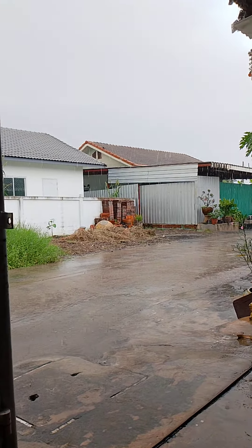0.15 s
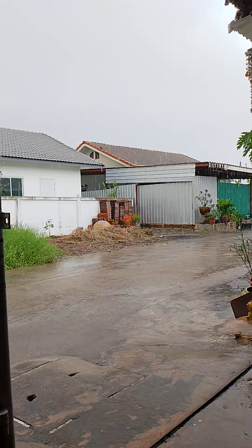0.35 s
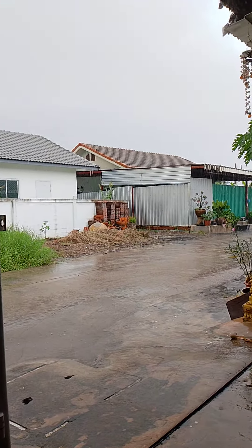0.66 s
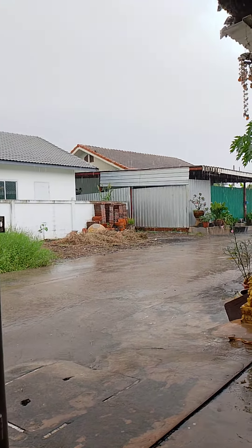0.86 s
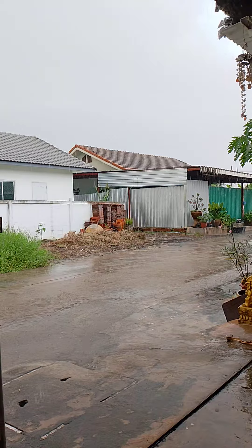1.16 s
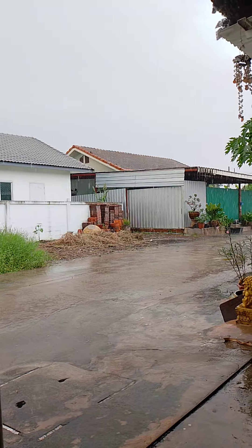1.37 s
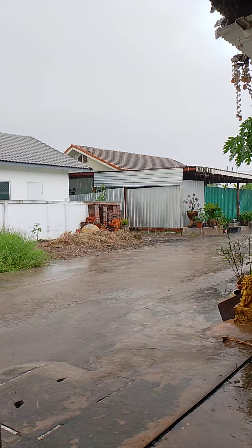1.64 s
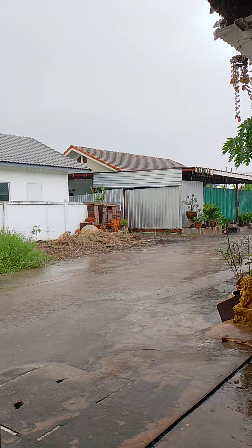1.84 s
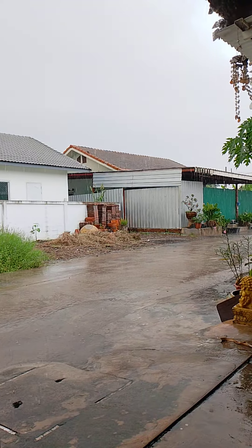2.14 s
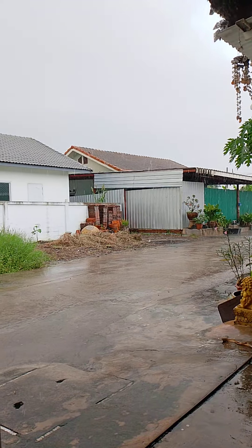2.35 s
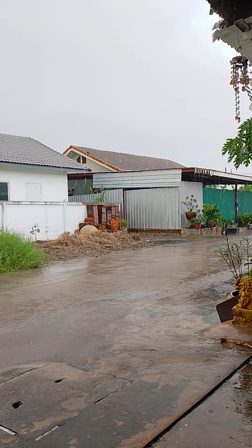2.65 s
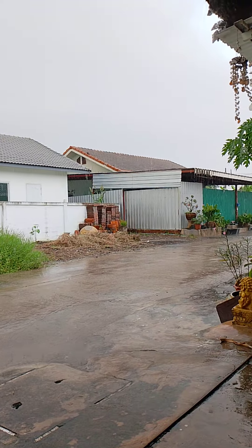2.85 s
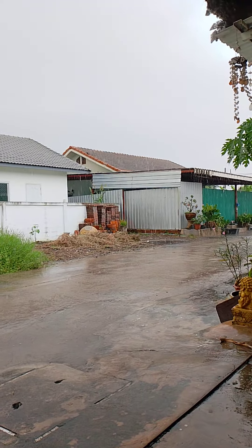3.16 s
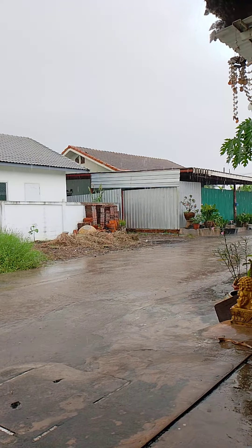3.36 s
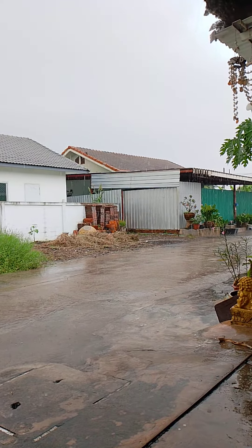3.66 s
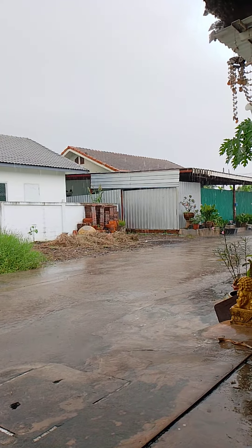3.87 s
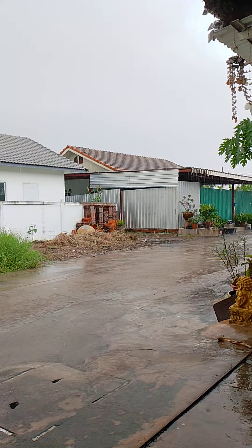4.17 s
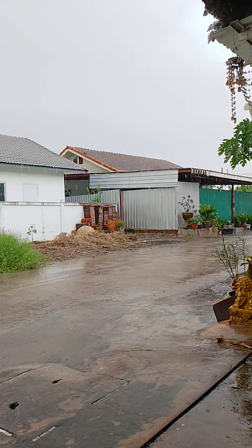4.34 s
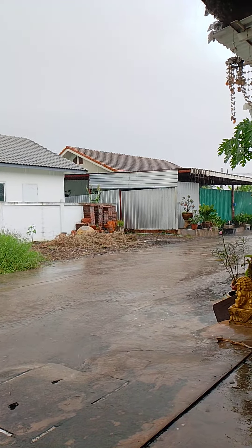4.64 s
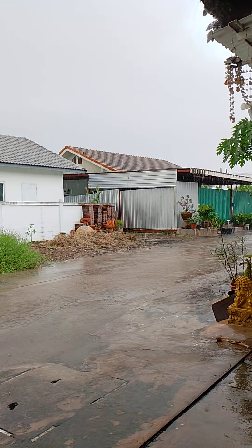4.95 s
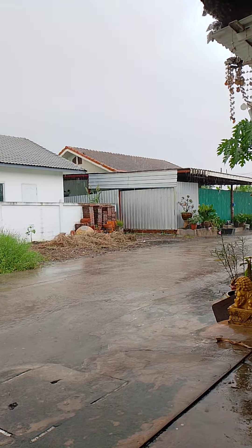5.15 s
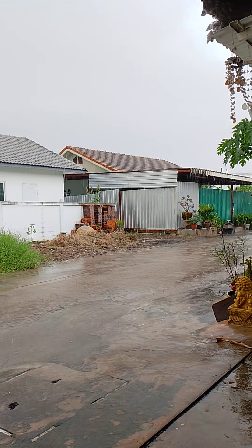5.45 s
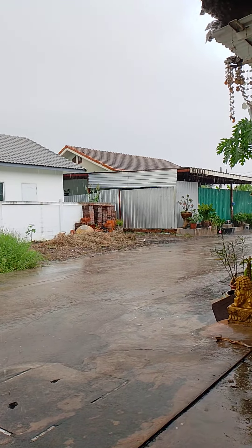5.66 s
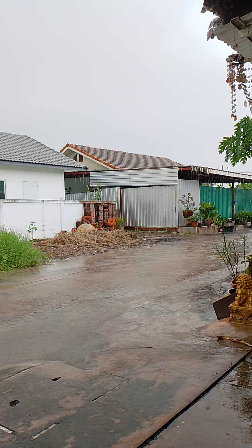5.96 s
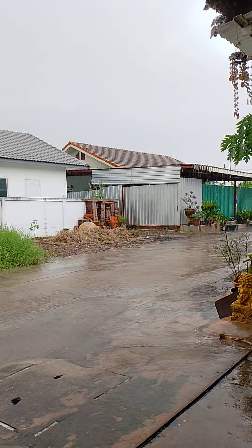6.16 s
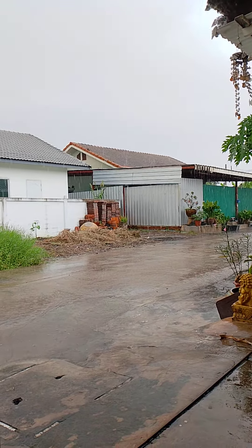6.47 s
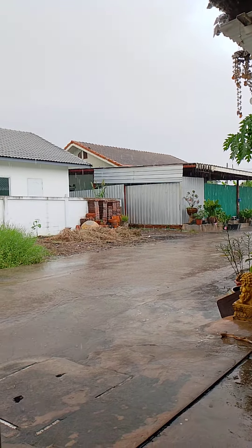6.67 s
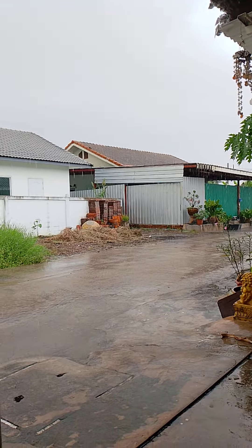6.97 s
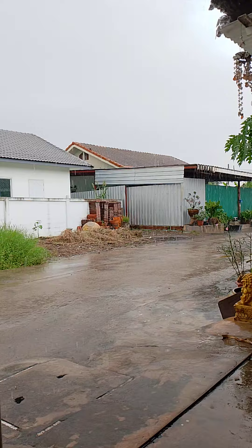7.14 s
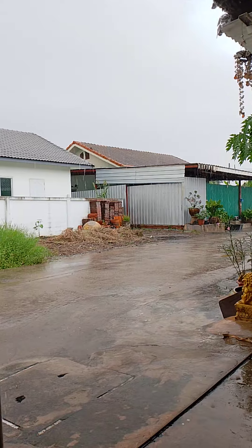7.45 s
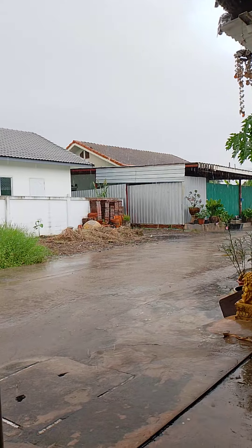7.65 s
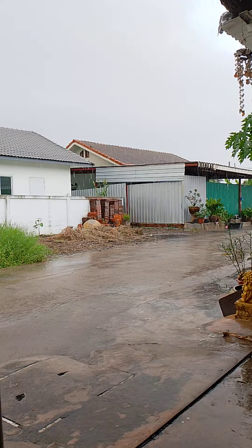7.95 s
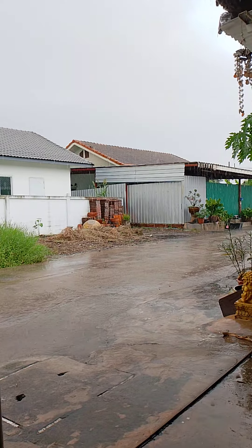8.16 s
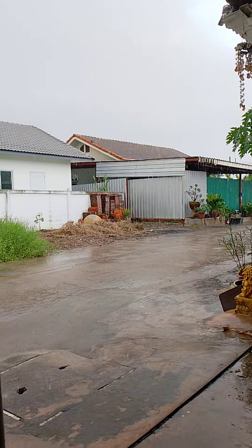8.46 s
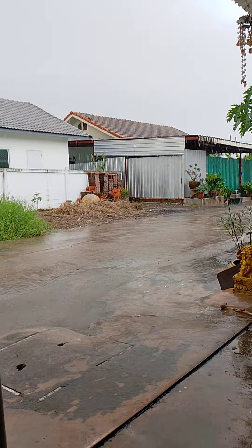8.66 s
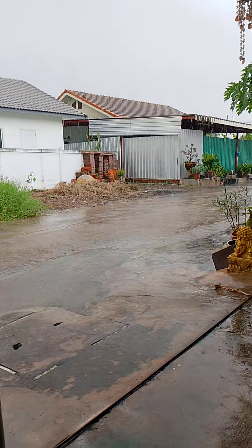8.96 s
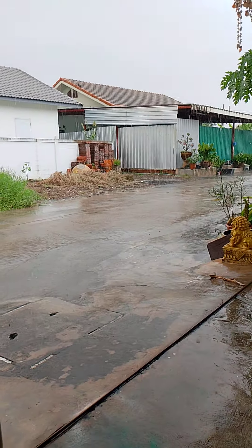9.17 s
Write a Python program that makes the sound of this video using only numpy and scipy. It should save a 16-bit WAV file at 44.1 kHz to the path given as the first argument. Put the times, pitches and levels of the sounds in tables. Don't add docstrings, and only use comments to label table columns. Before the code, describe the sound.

Steady rain hisses over a wet concrete yard while nearby eave drips crack on the slab and bubbles plop in puddles.

```python
import sys
import numpy as np
from scipy import signal
from scipy.fft import rfft, irfft, next_fast_len
from scipy.io import wavfile

SR = 44100
rng = np.random.default_rng(int(sys.argv[2]) if len(sys.argv) > 2 else 0)


def makeup_ratio(level_db):
    decades = np.asarray(level_db, float) / 20
    return 10 ** decades


def wav_record(signal):
    frames = np.transpose(np.atleast_2d(signal))
    bounded = np.clip(frames, -1, 1)
    quanta = np.round(bounded * 32767).astype(np.int16)
    wavfile.write(sys.argv[1], SR, quanta)


N = 410571

# [t/s, level/dB]
RAIN_STRENGTH = [(0.0, -33), (0.08, -32.5), (0.8, -32), (1.3, -32), (2.0, -32.5), (2.33, -31.5),
                 (2.64, -33.5), (2.85, -32), (3.6, -33), (4.95, -33), (5.26, -33), (5.83, -33.5),
                 (6.6, -33.5), (7.2, -32.5), (7.81, -32.5), (8.17, -34.5), (8.45, -33), (9.31, -33.5)]
# [f/Hz, level/dB per Hz]
ROOF_SPECTRUM = [(12, -47), (20, -9.5), (81, -3.5), (150, -6), (176, -1.5), (230, 1), (320, -12),
                 (450, -40)]
# [f/Hz, level/dB per Hz]
WASH_SPECTRUM = [(150, -33), (250, -6.5), (500, -4), (830, -4.5), (1250, -7.5), (1550, -5.5), (2000, -1),
                 (2700, -1), (3300, -6), (3900, -10), (4600, -12.5), (5600, -19), (6400, -17.5),
                 (8000, -21.5)]
# [t/s, peak level/dB, first f/Hz]
GURGLES = [
    (6.185, -37, 2200),
    (6.615, -38, 2150),
]
# [t/s, peak level/dB, f/Hz]
THUDS = [
    (1.70, -41.5, 229),
    (3.0, -45, 200),
    (3.43, -36.5, 186),
    (6.77, -42.5, 210),
]
# [t/s, peak level/dB, f/Hz]
PLOPS = [(0.0762, -16, 3530), (0.2952, -22, 2070), (0.6419, -25, 1870), (0.6429, -22, 3550),
         (1.5504, -24, 2190), (1.656, -25, 1990), (1.7255, -19, 3590), (1.7739, -21, 2320),
         (1.8701, -25, 3260), (1.9135, -19, 2750), (2.2298, -21, 2220), (2.7182, -24, 2580),
         (2.7407, -21, 3520), (3.239, -16, 3620), (3.3368, -23, 2100), (3.3692, -19, 2560),
         (4.5775, -26, 2070), (4.6458, -18, 2820), (4.6563, -18, 3600), (4.7785, -23, 3690),
         (5.3692, -17, 3820), (5.4849, -29, 2170), (5.5623, -22, 3580), (6.0008, -28, 2190),
         (6.3041, -22, 2730), (6.5909, -18, 2390), (6.9326, -21, 2340), (6.9401, -19, 3370),
         (7.9289, -21, 3400), (8.2871, -28, 2220)]
# [f/Hz, level/dB, time to fall 60 dB/s]
SLAB_MODES = [(4600, 0, .008), (5350, -1, .006), (6200, -1, .007), (7000, 0, .006)]
# [t/s, peak level/dB]
FAR_DRIPS = [(0.3576, -29), (1.8093, -28), (2.2674, -27), (3.4104, -30), (3.6456, -26), (4.0544, -30),
             (4.9974, -33), (5.2535, -26), (5.4909, -26), (5.8534, -29), (6.1963, -28), (6.2238, -26),
             (6.2504, -34), (6.8693, -32), (7.3474, -29), (7.4284, -28), (7.9644, -28.5), (8.4731, -27),
             (8.6083, -27), (8.8914, -28.5), (9.0573, -24)]
# [t/s, peak level/dB, low crack over peak/dB, high crack over peak/dB]
DRIPS = [(0.0757, -30, -7, -16), (0.4723, -29, -10, -10), (0.8969, -20, -13, -11), (1.057, -22, -13, -11),
         (1.3084, -25, -10, -14), (1.7155, -28, -7, -13), (1.8452, -27, -12, -10), (2.4149, -26, -12, -13),
         (2.605, -28, -10, -9), (2.7377, -23, -12, -12), (3.2286, -27, -7, -15), (3.6227, -28, -9, -12),
         (3.9295, -25, -9, -16), (4.365, -29, -8, -11), (4.6458, -26, -9, -15), (4.8459, -27, -9, -10),
         (5.032, -29, -7, -14), (5.1213, -29, -11, -11), (5.1781, -27, -13, -12), (5.5613, -30, -10, -11),
         (5.7753, -30, -9, -12), (6.0132, -28, -10, -13), (6.1444, -25, -11, -16), (6.7002, -27, -12, -10),
         (7.2943, -25, -11, -11), (7.416, -29, -8, -12), (7.8984, -30, -9, -13), (8.08, -27, -9, -15),
         (8.1145, -29, -10, -9), (8.7969, -27, -11, -14)]
# [t/s, depth/dB]
DUCKS = [
    (0.9, 2),
    (6.7, 3.5),
    (7.3, 3),
    (8.9, 2),
]
# [f/Hz, level/dB]
TOP_CUT = [(20, -0.5), (6700, 1), (7100, -5.5), (7400, -9), (7650, -19.5), (7800, -26.5), (7900, -38.5),
           (8000, -63.5), (8200, -90)]
# [t/s, lower f/Hz, upper f/Hz]
SIDE_SPLITS = [(.005, 4200, 6900), (.098, 6300, 7500), (1.096, 4200, 5650), (2.048, 6280, 7550),
               (3.023, 5700, 7560), (3.534, 5700, 7500), (4.556, 4200, 5700), (5.16, 6280, 7580),
               (6.042, 4200, 5160), (7.389, 5180, 6900), (7.458, 6320, 7550), (7.737, 6300, 7550),
               (8.55, 5170, 6280), (8.596, 4650, 6250)]


def rms_one(x):
    return x / np.sqrt(np.mean(x ** 2) + 1e-20)


def colour(x, spectrum):
    hz, db = np.transpose(spectrum)
    size = next_fast_len(N)
    bins_hz = np.arange(size // 2 + 1) * SR / size + 1
    gain = makeup_ratio(np.interp(np.log(bins_hz), np.log(hz), db))
    return irfft(rfft(x, size) * gain, size)[:N]


def drift(rate_hz):
    r = np.exp(-2 * np.pi * rate_hz * 40 / SR)
    noise = rng.standard_normal(N // 40 + 2002)
    slow = signal.lfilter([1], [1, -2 * r, r * r], noise)[2000:]
    return np.interp(np.arange(N) / 40, np.arange(len(slow)), rms_one(slow))


def ring(clicks, hz, t60):
    r, w = makeup_ratio(-60 / (t60 * SR)), 2 * np.pi * hz / SR
    return signal.lfilter([0, np.sin(w)], [1, -2 * r * np.cos(w), r * r], clicks + 1e-18)


def impacts(per_s, spread_db):
    sizes = makeup_ratio(spread_db * np.minimum(rng.exponential(1, N), 4.0))
    signs = rng.choice([-1, 1], N)
    return sizes * signs * (rng.random(N) < per_s / SR)


def roofs():
    return rms_one(colour(rng.standard_normal(N), ROOF_SPECTRUM))


def wash(dull_db, nearness_db):
    drops = colour(rng.standard_normal(N), WASH_SPECTRUM)

    def below(hz):
        return signal.sosfiltfilt(signal.butter(2, hz, fs=SR, output="sos"), drops)

    patter_band = below(1566)
    hiss_band = below(3760) - below(1390)
    treble_band = below(10800) - below(3720)
    out = makeup_ratio(0.47 * dull_db) * patter_band
    out += makeup_ratio(0.58 * drift(15)) * hiss_band
    out += makeup_ratio(0.73 * nearness_db + drift(31)) * treble_band
    return rms_one(out)


def patter(per_s, low_hz, high_hz, cycles, spread_db):
    drops = impacts(per_s, spread_db)
    pitches = np.geomspace(low_hz, high_hz, 14)
    dealt = rng.integers(0, len(pitches), N)
    return rms_one(sum(ring(drops * (dealt == k), hz, cycles / hz) for k, hz in enumerate(pitches)))


def crack(low_clicks, high_clicks):
    struck = [low_clicks, -low_clicks, high_clicks, -high_clicks]
    return sum(makeup_ratio(db) * ring(clicks, hz, t60) for clicks, (hz, db, t60) in zip(struck, SLAB_MODES))


def spatter(per_s):
    drops = impacts(per_s * makeup_ratio(3.6 * drift(8)), spread_db=4.0)
    return rms_one(crack(drops * rng.random(N), drops * rng.random(N)))


def gurgles():
    length_s, rise_hz_per_s = 0.057, 12000
    out, t = np.zeros(N + SR), np.arange(int(length_s * SR)) / SR
    swell = np.sin(np.pi * t / length_s)
    for s, peak_db, hz in GURGLES:
        song = np.sin(2 * np.pi * t * (hz + rise_hz_per_s * t / 2))
        out[round(s * SR):][:len(t)] += makeup_ratio(peak_db) * song * swell
    return out[:N] * makeup_ratio(3.0 * drift(120))


def thuds():
    attack_s, decay_s = 0.01, 0.018
    out, t = np.zeros(N + SR), np.arange(SR // 5) / SR
    shape = np.exp(-t / decay_s) * (1 - np.exp(-t / attack_s))
    shape /= shape.max()
    for s, peak_db, hz in THUDS:
        out[round(s * SR):][:len(t)] += makeup_ratio(peak_db) * shape * np.sin(2 * np.pi * hz * t)
    return out[:N]


def small_plops():
    count, peak_db, low_hz, high_hz = 30, -35.5, 1700, 3900
    when, size, pitch = rng.random((count, 3)).T
    hz = low_hz * (high_hz / low_hz) ** pitch
    return np.column_stack([when * N / SR, peak_db + 4.0 * (size - 0.5), hz])


def plops():
    out, t = np.zeros(N + SR), np.arange(SR // 40) / SR
    attack = 1 - np.exp(-t / 0.0004)
    for s, peak_db, hz in np.vstack([PLOPS, small_plops()]):
        tone = np.sin(2 * np.pi * hz * t * (0.96 + 8.0 * t))
        bubble = tone * np.exp(-t * hz / 3.0) * attack
        out[round(s * SR):][:len(t)] += makeup_ratio(peak_db + 3.0) * bubble
    return out[:N]


def small_drips():
    count, peak_db, low_db, high_db, spread_db = 60, -35, -9, -12, 2.0
    s = rng.random(count) * N / SR
    spread = np.clip(rng.standard_normal((count, 3)), -2, 1)
    chance = np.column_stack([s, [peak_db, low_db, high_db] + spread_db * spread])
    far_leak = [(s, db - 1.5, low_db, high_db) for s, db in FAR_DRIPS]
    return np.vstack([chance, far_leak])


def drips():
    lag_s, spray_decay_s, body_db = 0.0008, 0.016, -38
    s, peak_db, low_db, high_db = np.vstack([DRIPS, small_drips()]).T
    at = np.round((s + lag_s) * SR).astype(int)
    later = at + ((0.008 + 0.008 * rng.random(len(s))) * SR).astype(int)
    low, high, body = np.zeros((3, N + SR))
    spray = 0
    for clicks, share_db, band_hz in ((low, low_db, [3400, 5500]), (high, high_db, [5700, 7500])):
        clicks[at] = makeup_ratio(1.3 * peak_db + share_db + 14.5)
        clicks[later] += clicks[at] * makeup_ratio(-10.0)
        dying = signal.lfilter([1], [1, -np.exp(-1 / (spray_decay_s * SR))], clicks[:N])
        band = signal.butter(2, band_hz, "band", fs=SR, output="sos")
        hiss = rms_one(signal.sosfilt(band, rng.standard_normal(N)))
        spray = spray + makeup_ratio(-18.0) * dying * hiss
    body[at] = makeup_ratio(body_db)
    return crack(low[:N], high[:N]) + ring(body[:N], 2500, 0.0068) + spray


def ducking_db():
    attack_s, release_s = 0.0067, 0.15
    start_s, depth_db = np.transpose(DUCKS)
    since = np.maximum(np.arange(N) / SR - start_s[:, None], 0)
    shape = (1 - np.exp(-since / attack_s)) * np.exp(-since / release_s)
    return -depth_db @ shape / shape.max()


def scene():
    s, strength_db = np.transpose(RAIN_STRENGTH)
    wash_db = np.interp(np.arange(N) / SR, s, strength_db) + ducking_db()
    nearness_db = 0.93 * drift(8.6)
    dull_db = 1.17 * drift(7.1)
    treble_db = wash_db - 9.5 + nearness_db
    rain = makeup_ratio(wash_db - 15 + drift(7.5)) * roofs()
    rain += makeup_ratio(wash_db + 0.71) * wash(dull_db, nearness_db)
    rain += makeup_ratio(wash_db - 15.5) * patter(700, 1720, 4000, cycles=16.0, spread_db=0.5)
    rain += makeup_ratio(treble_db - 8.0) * patter(1500, 4000, 7600, cycles=22.0, spread_db=2.6)
    rain += makeup_ratio(treble_db - 12.0) * spatter(200)
    mono = rain + gurgles() + thuds() + plops() + drips()
    return np.array([mono, mono])


def side_difference(mono):
    apart, t = np.zeros(N), np.arange(N) / SR
    other = mono[::-1]
    for s, low_hz, high_hz in SIDE_SPLITS:
        sos = signal.ellip(6, 1, 50, [low_hz, high_hz], "band", fs=SR, output="sos")
        fade = np.cos(np.pi / 2 * np.clip((t - s) * SR / 800, -1, 1)) ** 1.5
        apart += signal.sosfilt(sos, other) * fade
    return apart * makeup_ratio(-1.0)


def band_limit(x):
    return signal.sosfilt(signal.butter(12, 7920, fs=SR, output="sos"), x)


def record(dry):
    mono = colour(dry[0], TOP_CUT)
    apart = side_difference(mono)
    return band_limit(np.array([mono + apart, mono - apart]))


dry = scene()
out = record(dry)
wav_record(out)
```